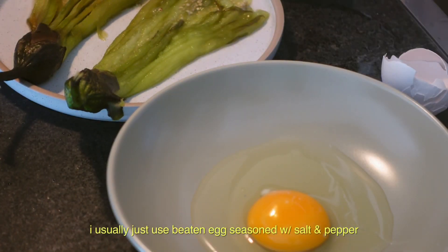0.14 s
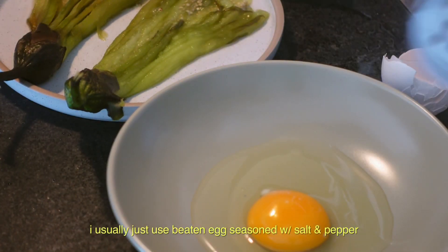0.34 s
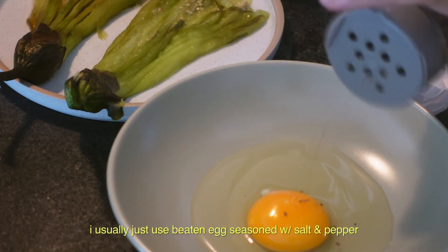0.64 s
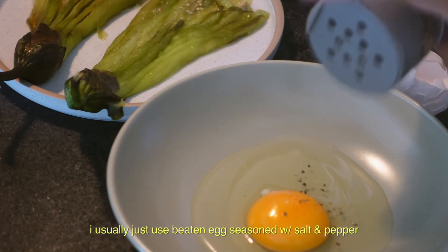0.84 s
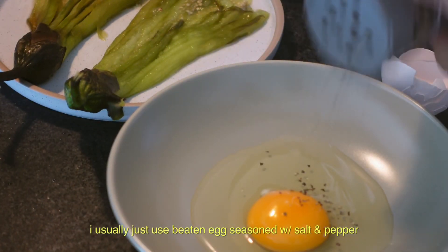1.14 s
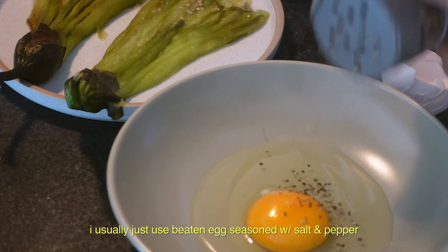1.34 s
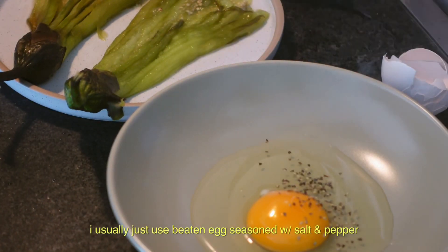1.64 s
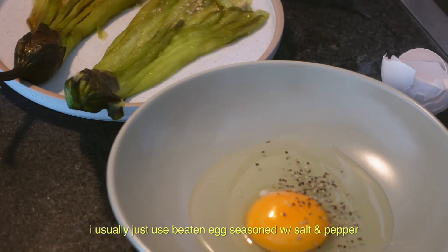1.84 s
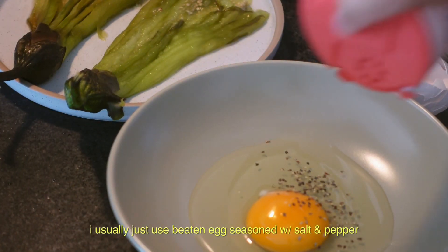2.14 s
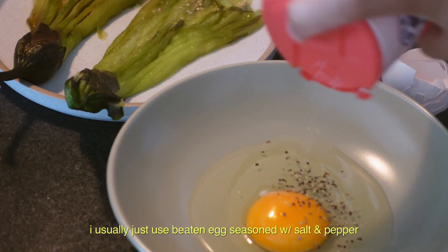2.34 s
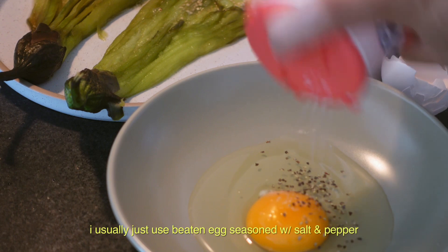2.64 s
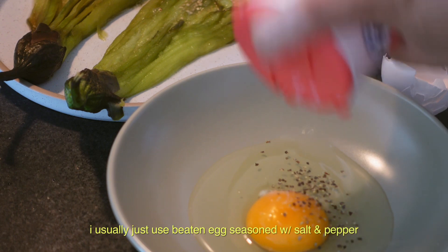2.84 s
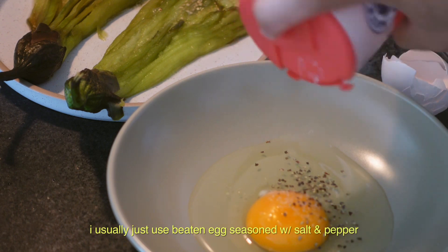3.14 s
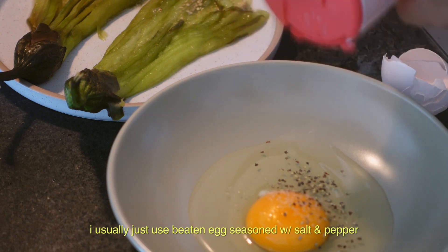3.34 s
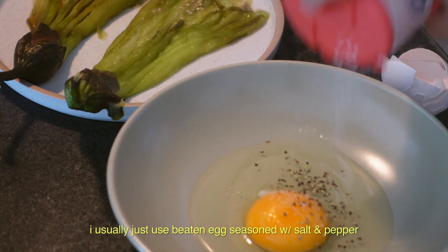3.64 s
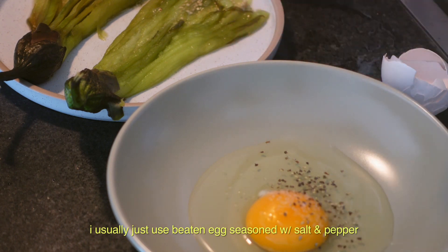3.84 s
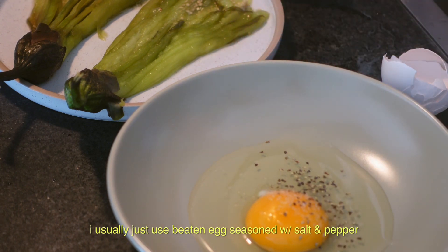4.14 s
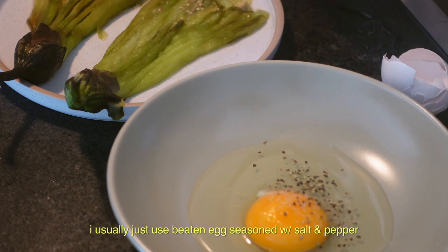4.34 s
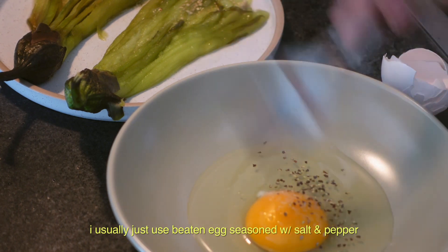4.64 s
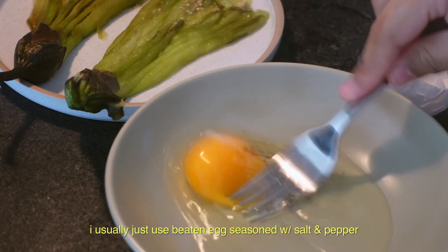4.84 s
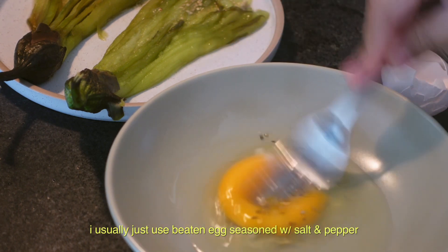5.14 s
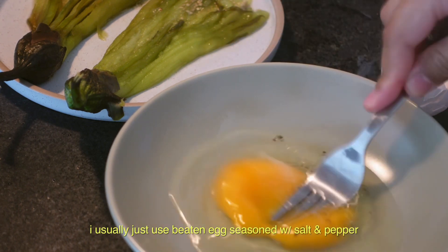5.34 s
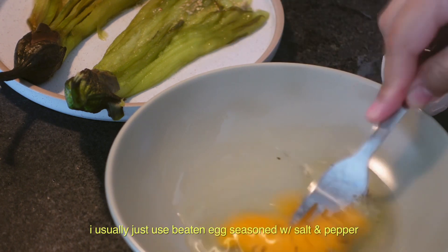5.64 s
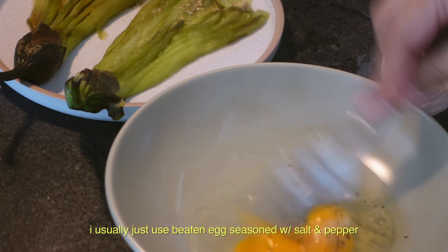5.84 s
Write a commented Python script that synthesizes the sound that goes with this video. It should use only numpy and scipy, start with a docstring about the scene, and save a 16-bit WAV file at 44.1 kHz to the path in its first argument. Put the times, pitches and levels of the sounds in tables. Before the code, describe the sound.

Pepper rustles faintly in a shaker, then salt slides in its box in uneven, hissing surges. The box knocks and is set down. A fork rasps softly off the counter, then scrapes, squeaks and clinks in a ceramic bowl, growing louder as it beats a faintly squelching egg. The sounds are close to the microphone in a small, slightly echoing kitchen with a low appliance hum.

```python
"""An egg is seasoned and beaten in a ceramic bowl on a kitchen counter, close to the microphone.
First pepper rustles in a shaker; from about 2 s salt slides and knocks in its box, both heard as many
tiny impacts. At 4.2 s a fork rasps off the counter. Its tines then scrape and squeal on the glaze by
stick-slip friction and strike the bowl ever harder, about six times a second, exciting its modes as
the egg squelches. Throughout, an appliance hums and the small, hard room reverberates."""
import sys
import numpy as np
from scipy import signal
from scipy.fft import rfft, irfft
from scipy.io import wavfile
from scipy.ndimage import uniform_filter1d

SR = 44100
rng = np.random.default_rng(int(sys.argv[2]) if len(sys.argv) > 2 else 0)


def file_out(sig):
    """Save sig as 16-bit WAV at sys.argv[1]."""
    # one column per channel
    cols = np.atleast_2d(sig).T
    # limit, then scale
    lim = np.clip(cols, -1, 1)
    pcm = np.round(lim * 32767).astype(np.int16)
    wavfile.write(sys.argv[1], SR, pcm)


N = 263718
T = np.arange(N) / SR


# Spectrum of the fork's impact: (frequency [Hz], relative level [dB])
CRACK_SPECTRUM = [(100, -54), (330, -41), (600, -19), (1500, -27), (2200, -12.5), (2800, -2), (3300, 1),
                  (4500, 0), (6000, -1), (7000, 2.5), (8200, 5), (8800, -5.5), (10300, -1), (13000, -3),
                  (16000, -10.5)]
# Resonances of the tines: (frequency [Hz], width [Hz], relative level [dB])
TINE_RESONANCES = [(3214, 81, 2.5), (3454, 100, -4), (5215, 240, -8), (6070, 170, -32), (7170, 95, 1.5),
                   (7940, 65, -9), (9760, 470, -9.5), (11820, 180, -14.5), (13000, 300, -20)]
# Resonances of the bowl's hollow: (frequency [Hz], width [Hz], relative level [dB])
CAVITY_RESONANCES = [(767, 92, -1), (1060, 55, 4), (1247, 110, -2.5), (1750, 600, -13.5)]
# Normal modes of the ceramic: (frequency [Hz], relative level [dB], T60 [s])
BOWL_MODES = [(520, -20, .2), (740, -22, .25), (1150, -15, .3), (1168, -12, .36), (2980, -5, .28),
              (3236, 0, .22), (3285, -1, .3), (3417, -1, .26), (3471, -4, .22), (4312, -7, .27),
              (5382, -7, .25), (5594, -11, .24), (6072, -7, .16), (6518, -1, .22), (6972, 0, .2),
              (7103, 0, .26), (7223, -2, .22), (7568, -3, .22), (8100, 3, .24), (8160, -1, .2),
              (8225, -1, .22), (9195, -6, .18), (9978, -6, .18), (10208, 0, .17), (11840, -9, .17),
              (12490, -7, .12)]
# Blows of the fork: (time [s], level [dB], contact time [s], tines re crack [dB], bowl re crack [dB],
# cavity re crack [dB], treble slope [dB/octave])
FORK_BLOWS = [(4.86, -43, 0.0031, 9.5, -4, -25, 2), (5.1252, -53.5, 0.0049, 11.5, -13, -16, -11),
              (5.1644, -38, 0.0032, 5.5, -19, -11, -0.5), (5.297, -31.5, 0.0037, 7.5, -13, -39, -0.5),
              (5.6148, -20, 0.0033, 1.5, -8.5, -31.5, -1), (5.786, -14.5, 0.0076, -7.5, -4.5, -30.5, -1.5),
              (5.949, -13.5, 0.0044, -13, -4.5, -26.5, -0.5)]

def fork_blows():
    """Impact excitation: each blow cracks and briefly drives tines and cavity; the bowl rings longer."""
    fork, bowl, t = np.zeros(N), np.zeros(N), T[:SR // 2]
    for time, db, contact_s, tine_db, bowl_db, cavity_db, slope in FORK_BLOWS:
        crack = impact(t, contact_s, lambda hz: amp(read(CRACK_SPECTRUM, hz)) * tilt(hz, slope))
        tines = impact(t, contact_s, lambda hz: resonances(TINE_RESONANCES, hz) * tilt(hz, slope + 2))
        cavity = impact(t, contact_s, lambda hz: resonances(CAVITY_RESONANCES, hz))
        add(fork, time, amp(db) * (crack + amp(tine_db) * tines + amp(cavity_db) * cavity))
        add(bowl, time, amp(db + bowl_db) * ring(BOWL_MODES, t))
    return fork, bowl


# Slides of the tines over the glaze:
# (peak time [s], rise [s], fall [s], level [dB], frequency ratio [1], treble slope [dB/octave])
TINE_SCRAPES = [(4.78, 0.12, 0.1, -57.5, 1.06, 4.5), (5.001, 0.034, 0.066, -54.5, 1.04, -3),
                (5.027, 0.0088, 0.028, -44, 0.98, 1), (5.11, 0.029, 0.014, -66, 1.4, 8),
                (5.21, .02, 0.014, -48, 0.93, 1), (5.467, .012, 0.069, -47, 1, -7),
                (5.498, .012, 0.027, -46, 0.9, -4.5), (5.64, 0.019, 0.025, -30.5, 0.84, 6),
                (5.68, .025, 0.011, -35, 0.89, -2), (5.975, 0.021, 0.036, -19.5, 1.07, 6)]
# Rubs as the fork enters the bowl: (peak time [s], duration [s], level [dB])
CAVITY_RUBS = [(4.632, 0.07, -60.5), (4.785, 0.3, -49.5)]

def scrapes():
    """Stick-slip friction drives the tines, each scrape at its own pitch, and the bowl's cavity."""
    out = np.zeros(N)
    for time, rise, fall, db, ratio, slope in TINE_SCRAPES:
        pressure = swell(rise, fall)
        slips = grains(len(pressure), per_s=6000, spread_db=0.79)
        tines = colour(slips, lambda hz: resonances(TINE_RESONANCES, hz / ratio) * tilt(hz, slope))
        add(out, time - rise, amp(db) * unit(tines) * pressure)
    cavity = resonate(rng.standard_normal(N), CAVITY_RESONANCES)
    return out + cavity * surges(CAVITY_RUBS, rise_share=0.51, sharpness=1.03)


# Squeals of a tine: (peak time [s], rise [s], fall [s], level [dB], start pitch [Hz], end pitch [Hz])
TINE_SQUEALS = [(4.781, 0.13, 0.068, -51.5, 3134, 3168), (4.819, 0.14, 0.072, -49.5, 5130, 5280),
                (5.497, 0.013, 0.013, -41.5, 3220, 3540), (5.492, 0.0052, 0.015, -38, 5820, 7830),
                (5.642, 0.02, .037, -27.5, 3415, 3403), (5.686, 0.0095, 0.0079, -25.5, 3460, 3386)]

def squeals(waver=0.018):
    """Self-excited oscillation: slips lock into a tone that glides and wavers as it swells and fades."""
    out = np.zeros(N)
    for time, rise, fall, db, start_hz, end_hz in TINE_SQUEALS:
        envelope = swell(rise, fall)
        wobble = unit(uniform_filter1d(rng.standard_normal(len(envelope)), size=60))
        hz = np.linspace(start_hz, end_hz, len(envelope)) * (1 + waver * wobble)
        tone = unit(np.sin(2 * np.pi * np.cumsum(hz) / SR))
        add(out, time - rise, amp(db) * tone * envelope)
    return out


# Spectrum of the stirred egg: (frequency [Hz], relative level [dB])
SQUELCH_SPECTRUM = [(200, -4), (500, 0), (1200, -5), (1700, -2), (2350, 1), (4200, -7.5), (6500, -8),
                    (9000, -12), (15000, -16)]
# Modes of an air pocket in the egg: (frequency [Hz], relative level [dB], T60 [s])
BUBBLE_MODES = [(1980, -13, 0.22), (1990, -3, 0.038), (2370, 5, 0.013)]

def egg(start_s=4.89, start_db=-65, growth_db_per_s=10, plop_s=5.726, plop_db=-40):
    """Bubble resonance: an air pocket closes with a plop, amid wet noise growing as the yolk breaks."""
    stirring = amp(start_db + growth_db_per_s * (T - start_s)) * (T > start_s)
    out = unit(shape(grains(N, per_s=9000, spread_db=3.1), SQUELCH_SPECTRUM)) * stirring
    add(out, plop_s, amp(plop_db) * ring(BUBBLE_MODES, T[:SR // 4]))
    return out


# Spectrum of sliding salt: (frequency [Hz], relative level [dB])
SALT_SPECTRUM = [(800, -26.5), (1500, -20), (1900, -14), (2300, -6), (2750, -3.5), (3400, -3.5),
                 (4500, -1.5), (6500, 1), (8500, -0.5), (12300, -6), (15000, -11.5), (16000, -15)]
# Slides of the salt in its box: (peak time [s], duration [s], relative level [dB])
SALT_FLOW = [(1.97, 0.15, -42.5), (2.07, 0.26, -36.5), (2.21, 0.28, -37), (2.36, 0.29, -42.5),
             (2.48, 0.09, -35.5), (2.56, 0.13, -39), (2.63, 0.15, -37), (2.735, 0.16, -40.5),
             (2.88, 0.23, -37.5), (3.015, 0.16, -32.5), (3.15, 0.2, -47), (3.29, 0.17, -54),
             (3.385, 0.057, -35.5), (3.452, 0.14, -29), (3.6, 0.23, -30), (3.79, 0.25, -56),
             (3.945, 0.15, -43.5), (4.125, 0.31, -29)]

def salt(split_hz=4000, heap_lag_s=0.021, heap_start_s=1.916, loosen_s=0.17):
    """Granular flow: loose crystals hiss along the box; the lower hiss of the whole heap lags behind."""
    flow = surges(SALT_FLOW, rise_share=0.56, sharpness=1.077)
    pole = np.exp(-1 / (heap_lag_s * SR))
    loosened = np.clip((T - heap_start_s) / loosen_s, 0, 1)  # as the box is first tipped
    heap_flow = signal.lfilter([1 - pole], [1, -pole], flow) * loosened
    hiss = shape(grains(N, per_s=14000, spread_db=0.35), SALT_SPECTRUM)
    low = signal.sosfiltfilt(signal.butter(4, split_hz, fs=SR, output="sos"), hiss)
    return amp(-2) * unit(hiss - low) * flow + amp(-12) * unit(low) * heap_flow


# Spectrum of the salt box's thud: (frequency [Hz], relative level [dB])
THUD_SPECTRUM = [(200, -8), (600, -10), (1200, -6), (2200, -3.5), (5000, 8.5), (8000, -3), (15000, -8)]
# Normal modes of the box: (frequency [Hz], relative level [dB], T60 [s])
SALT_BOX_MODES = [(2170, -5, .035), (2270, -3, .04), (2370, -2, .045), (2480, -3, .03), (2650, -3, .025),
                  (3050, -6, .03), (4950, -3, .03), (6900, -4, .02), (8000, -1, .035), (8700, -4, .02),
                  (10400, -5, .02)]
# Knocks: (time [s], level [dB], contact time [s], ring gain [dB], thud gain [dB], thud cutoff [Hz])
BOX_KNOCKS = [(1.829, -56.5, .006, -3, -8, 1510), (3.249, -47, 0.0019, -16, -7, 6000),
              (3.6447, -21, 0.0036, -3.5, -7, 1400), (4.134, -25.5, 0.0074, -21, 3, 300)]

def box_knocks():
    """Impact excitation: the box is jolted and set down; only firm contact gives a deep thud."""
    out, t = np.zeros(N), T[:SR // 4]
    for time, db, contact_s, ring_db, thud_db, cutoff_hz in BOX_KNOCKS:
        def thud_gain(hz):
            return amp(read(THUD_SPECTRUM, hz)) * (hz ** 2 / (hz ** 2 + cutoff_hz ** 2)) ** 2
        thud = impact(t, contact_s, thud_gain, rise_s=contact_s / 2)
        add(out, time, amp(db) * (amp(thud_db) * thud + amp(ring_db) * ring(SALT_BOX_MODES, t)))
    return out


# Resonances of the dragged fork: (frequency [Hz], width [Hz], relative level [dB])
DRAG_RESONANCES = [(1380, 500, -11.5), (2320, 310, -2.5), (2890, 190, 0), (3910, 79, -4), (4190, 170, -1),
                   (5350, 390, -11), (6180, 180, -4.5), (7450, 160, -12), (8530, 100, -13),
                   (9600, 250, -19.5)]

def fork_drag(start_s=4.243, end_s=4.68, fade_db_per_s=34.5, split_hz=3100, treble_decay_s=0.12):
    """Sliding friction: the fork ticks on the counter, then its rasp fades and dulls as it lifts."""
    age = np.maximum(T - start_s, 0)
    tick_db = 3 * np.exp(-age / 0.004)
    envelope = amp(-46 - fade_db_per_s * age + tick_db) * (T > start_s) * (T < end_s)
    rasp = resonate(grains(N, per_s=6000, spread_db=1.3), DRAG_RESONANCES)
    low = signal.sosfiltfilt(signal.butter(3, split_hz, fs=SR, output="sos"), rasp)
    treble = 2.03 * (rasp - low) * np.exp(-age / treble_decay_s)
    return (low + treble) * envelope


# Spectrum of the pepper flakes: (frequency [Hz], relative level [dB])
PEPPER_SPECTRUM = [(1500, -31), (3800, -13.5), (5000, -11.5), (6200, -2), (8200, -0.5), (10000, -3),
                   (13000, -7.5), (16000, -11)]
# Resonances of the shaker's cap: (frequency [Hz], width [Hz], relative level [dB])
CAP_RESONANCES = [(1760, 13, 5.5), (2290, 140, -11), (3000, 140, -9), (3200, 47, -6)]
# Shakes of the pepper: (peak time [s], duration [s], relative level [dB])
SHAKES = [(.03, 0.22, -61), (.325, 0.3, -57), (.47, 0.14, -55), (.59, .2, -57), (1.055, 0.33, -57.5),
          (1.13, 0.08, -54.5), (1.182, 0.036, -48.5), (1.203, 0.098, -49.5), (1.235, .06, -58),
          (1.285, 0.25, -61), (1.455, .05, -68), (1.665, .15, -55), (1.755, 0.5, -61.5)]

def pepper():
    """Shot noise: flakes rustle in the shaker; a faint ring near 1.8 kHz lingers under the salt."""
    hiss = unit(shape(grains(N, per_s=5000, spread_db=2.2), PEPPER_SPECTRUM))
    faint_ring = resonate(grains(N, per_s=5000, spread_db=1.0), CAP_RESONANCES)
    shaking = surges(SHAKES, rise_share=0.52, sharpness=1.8)
    lingering = held(start=1.25, attack=0, hold=1.46, release=0.5, db=-74)
    return amp(-2) * hiss * shaking + faint_ring * lingering


# Drones as the fork is fetched and as it stirs: (start [s], attack [s], hold [s], release [s], level [dB])
DRONE_SPANS = [(4.216, 0.039, 0.37, 0.46, -54.5), (4.994, .25, 0.3, 0.75, -54.5)]

def drone(centre_hz=210.2, width_hz=31):
    """Forced vibration: noise drives one low resonance, likely of the counter top."""
    band = resonate(rng.standard_normal(N), [(centre_hz, width_hz, 0)], steep=1.05)
    return band * sum(held(*span) for span in DRONE_SPANS)


# Spectrum of the room noise: (frequency [Hz], relative level [dB])
AMBIENT_SPECTRUM = [(25, -35), (50, -35), (70, -3.5), (105, -6.5), (212, 0), (384, -15.5), (720, -16),
                    (1480, -23.5), (2200, -24), (3720, -32), (5570, -30.5), (6600, -35), (9320, -29.5),
                    (15000, -44)]
# Hum and whine of an appliance: (frequency [Hz], width [Hz], level [dB])
APPLIANCE_BANDS = [(119, 4, -68), (209.7, 17.3, -70), (1785, 19, -80.5), (5250, 52, -84.5),
                   (6130, 14, -77.5), (6030, 120, -86), (5990, 31, -78.5)]

def ambience(wash_db=-61.5):
    """Stationary noise: a broadband wash lies under the narrow bands of an appliance."""
    wash = unit(shape(rng.standard_normal(N), AMBIENT_SPECTRUM))
    hum = sum(amp(db) * resonate(rng.standard_normal(N), [(hz, width, 0)], steep=1.66)
              for hz, width, db in APPLIANCE_BANDS)
    return amp(wash_db) * wash + hum


# Reverberation time of the kitchen: (frequency [Hz], T60 [s])
KITCHEN_T60 = [(300, 0.43), (1500, 0.66), (3500, 0.37), (8000, 0.36), (15000, 0.27)]

def reverberation(x, gap_s=0.00096):
    """Diffuse field: dense reflections decay exponentially, each band at its own rate."""
    hz, t, spectra = signal.stft(grains(SR // 2, per_s=7000, spread_db=0.79), SR, nperseg=256)
    decay = amp(-60 * t / read(KITCHEN_T60, hz)[:, None])
    tail = signal.istft(spectra * decay, SR, nperseg=256)[1]
    tail *= np.clip(T[:len(tail)] / gap_s - 1, 0, 1)
    return signal.oaconvolve(x, tail / np.linalg.norm(tail))[:N]


def grains(count, per_s, spread_db):
    """Poisson process: a train of tiny impacts of uneven size."""
    size = amp(spread_db * np.minimum(rng.exponential(1, count), 4))
    return size * rng.standard_normal(count) * (rng.random(count) < per_s / SR)


def impact(t, decay_s, gain, rise_s=0.00057):
    """Source and filter: a firm touch with quickly dying chatter, shaped by gain(Hz)."""
    chatter = grains(len(t), per_s=25000, spread_db=0.52)
    force = chatter * np.exp(-t / decay_s) * (1 - np.exp(-t / rise_s))
    return unit_hit(colour(force, gain))


def ring(modes, t, rise_s=0.00029):
    """Free vibration: damped modes build up during contact, then decay."""
    decay = sum(amp(db - 60 * t / t60) * np.sin(2 * np.pi * (hz * t + rng.random()))
                for hz, db, t60 in modes)
    return unit_hit(decay * (1 - np.exp(-(t / rise_s) ** 2)))


def swell(rise, fall):
    """Triangular envelope: the hand's pressure builds, then eases."""
    return np.interp(np.arange(0, rise + fall, 1 / SR), [0, rise, rise + fall], [0, 1, 0])


def surges(pushes, rise_share, sharpness):
    """Incoherent addition: the powers of overlapping pushes of the hand sum."""
    power = np.zeros(N)
    for peak, duration, db in pushes:
        corners = [peak - rise_share * duration, peak, peak + (1 - rise_share) * duration]
        power += (amp(db) * np.interp(T, corners, [0, 1, 0]) ** sharpness) ** 2
    return np.sqrt(power)


def held(start, attack, hold, release, db):
    """Trapezoidal envelope: a gain rises, holds and falls."""
    return amp(db) * np.interp(T, start + np.cumsum([0, attack, hold, release]), [0, 1, 1, 0])


def colour(x, gain, size=8192):
    """Minimum-phase filter of magnitude gain(Hz), by folding the cepstrum."""
    magnitude = np.maximum(gain(np.fft.rfftfreq(size, 1 / SR)), 1e-5)
    cepstrum = irfft(np.log(magnitude))
    cepstrum[1:size // 2] *= 2
    cepstrum[size // 2 + 1:] = 0
    response = irfft(np.exp(rfft(cepstrum)))[:size // 2]
    return signal.oaconvolve(x, response)[:len(x)]


def shape(x, spectrum):
    """Filtering by a tabulated spectrum."""
    return colour(x, lambda hz: amp(read(spectrum, hz)))


def resonate(x, peaks, steep=1.34):
    """Forced response of resonances to x, at rms 1."""
    return unit(colour(x, lambda hz: resonances(peaks, hz, steep)))


def resonances(peaks, hz, steep=1.34):
    """Magnitude response of resonances whose powers add."""
    return np.sqrt(sum(amp(db) ** 2 / (1 + (2 * (hz - centre) / width) ** 2) ** steep
                       for centre, width, db in peaks))


def tilt(hz, db_per_octave, pivot_hz=6000):
    """Spectral slope through the treble."""
    return amp(db_per_octave * np.log2(np.maximum(hz, 2000) / pivot_hz))


def read(points, hz):
    """Interpolation on a log-frequency axis."""
    frequencies, values = np.transpose(points)
    return np.interp(np.log(hz + 1), np.log(frequencies + 1), values)


def amp(db):
    """Decibels to amplitude ratio."""
    return 10 ** (np.asarray(db) / 20)


def unit(x):
    """Normalisation to rms 1."""
    return x / np.sqrt(np.mean(x ** 2) + 1e-30)


def unit_hit(x):
    """Normalisation to the energy of 5 ms at rms 1."""
    return x * np.sqrt(0.005 * SR / (np.sum(x ** 2) + 1e-30))


def add(mix, start_s, sound):
    """Superposition of a sound on the mix."""
    part = mix[max(round(start_s * SR), 0):][:len(sound)]
    part += sound[:len(part)]


# Stereo spread of the reflections: (frequency [Hz], side re mid [dB])
REVERB_SPREAD = [(200, -9), (1200, -7), (2600, -25.5), (7000, -13.5), (10000, -34.5), (15000, -35)]
# Stereo spread of the room noise: (frequency [Hz], side re mid [dB])
AMBIENT_SPREAD = [(60, -18), (140, -17), (260, -10.5), (600, -8), (3000, -8.5), (6000, -9), (10000, -25)]

def scene():
    """Mid-side stereo: the bowl is central, the fork comes from the right, the room spreads a little."""
    fork, bowl = fork_blows()
    seasoning, drag, box = pepper() + salt(), fork_drag(), box_knocks()
    stirring = scrapes() + squeals() + egg()
    direct = seasoning + drag + box + fork + stirring + bowl
    to_room = (amp(-11.5) * (seasoning + drag) + amp(-8) * box + amp(-4.5) * fork
               + amp(-8.5) * stirring + amp(-2.5) * bowl)
    mid = direct + drone() + reverberation(to_room) + ambience()
    side = shape(reverberation(to_room), REVERB_SPREAD) + shape(ambience(), AMBIENT_SPREAD)
    side += amp(-17) * reverberation(drag) - amp(-14) * drag
    return np.array([mid + side, mid - side]) * amp([[-0.2], [0.2]])


def record(dry, low_cut_hz=52, high_cut_hz=15900):
    """Band limiting: the microphone cuts the bass and the recorder the highest treble."""
    thinned = signal.sosfilt(signal.butter(3, low_cut_hz, "highpass", fs=SR, output="sos"), dry)
    lowpass = signal.firwin(511, high_cut_hz, window=("kaiser", 9), fs=SR)
    return signal.oaconvolve(thinned, lowpass[None], "same")


dry = scene()
out = record(dry)
file_out(out)
```